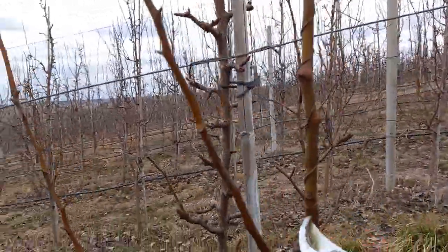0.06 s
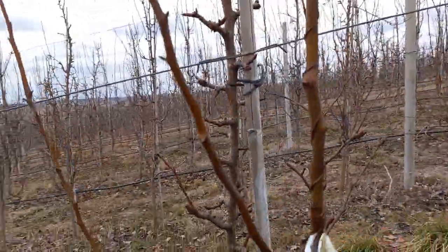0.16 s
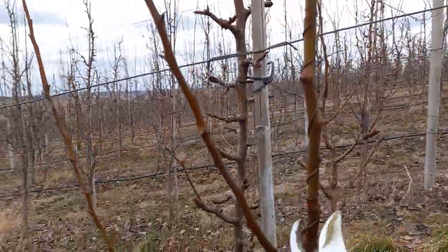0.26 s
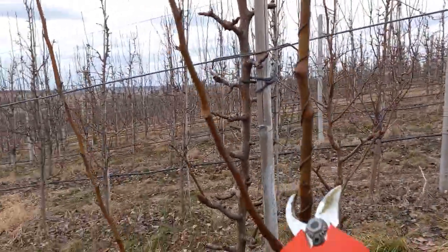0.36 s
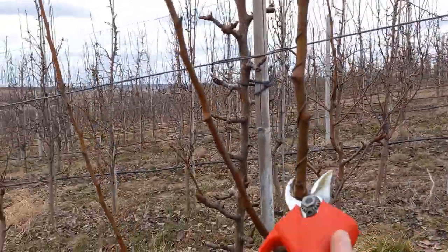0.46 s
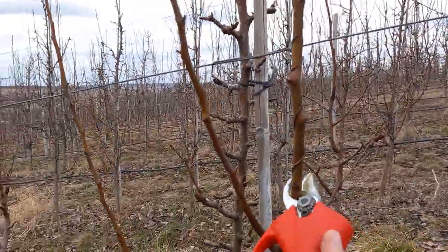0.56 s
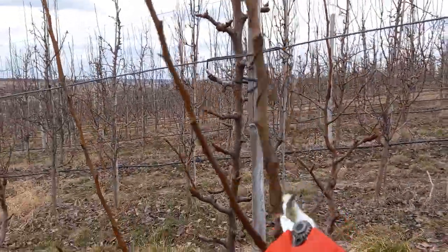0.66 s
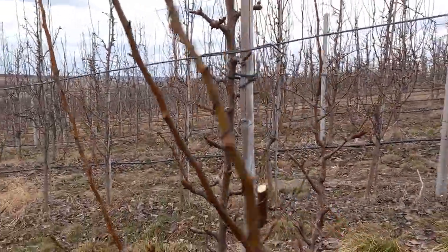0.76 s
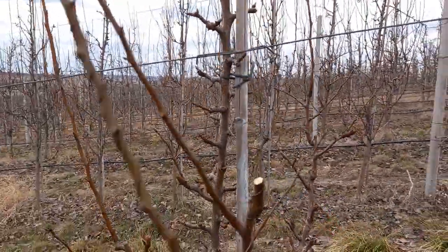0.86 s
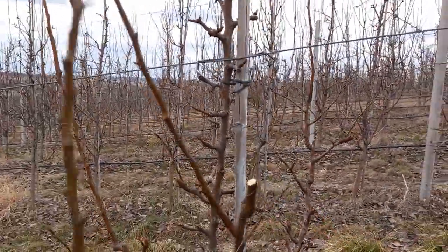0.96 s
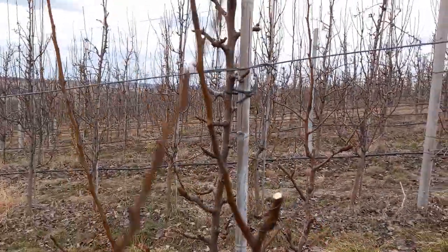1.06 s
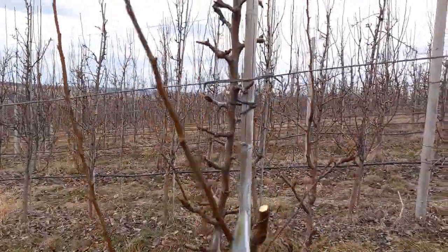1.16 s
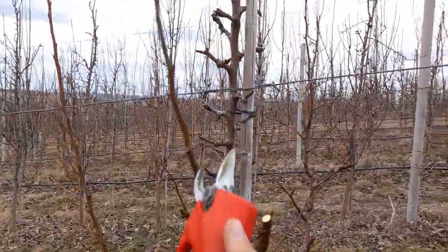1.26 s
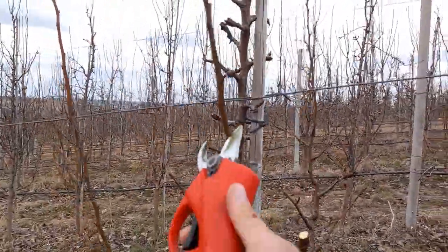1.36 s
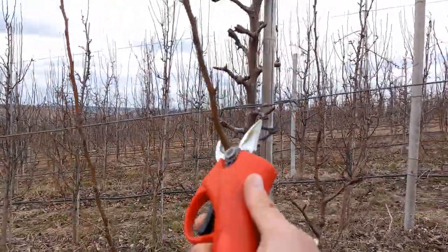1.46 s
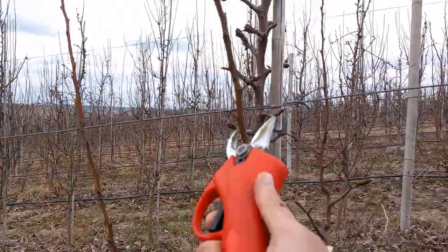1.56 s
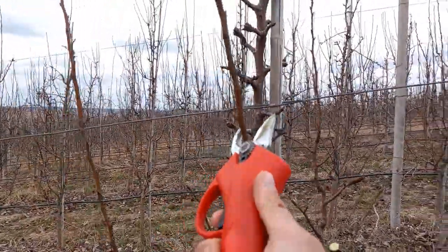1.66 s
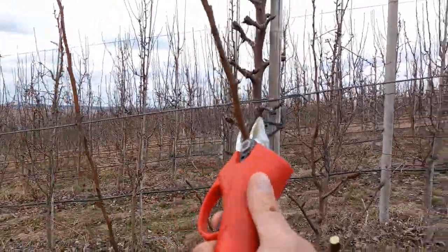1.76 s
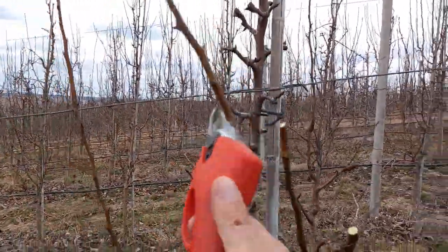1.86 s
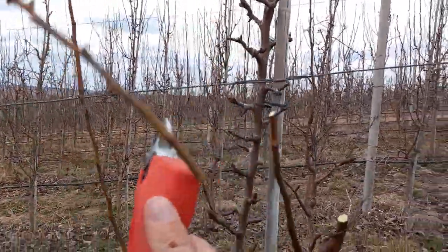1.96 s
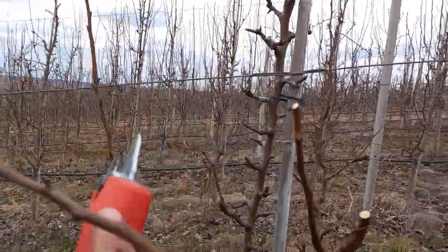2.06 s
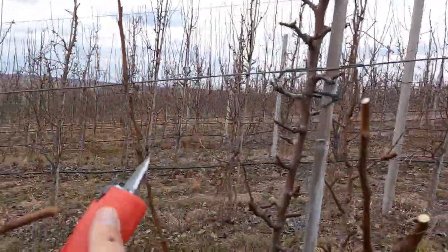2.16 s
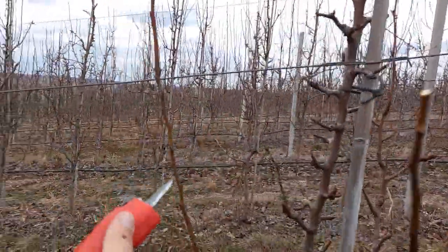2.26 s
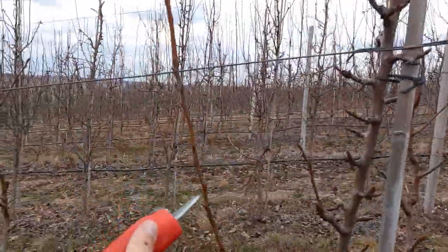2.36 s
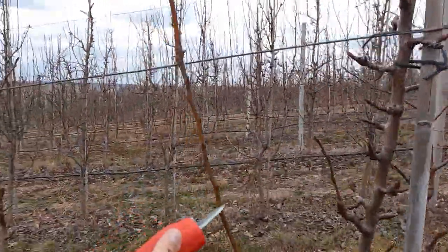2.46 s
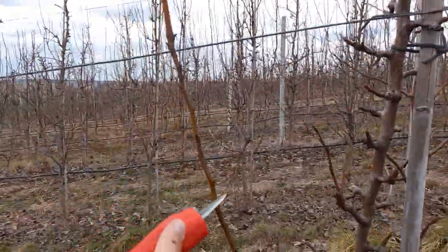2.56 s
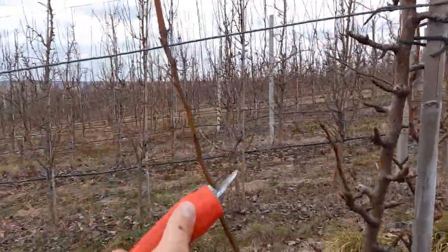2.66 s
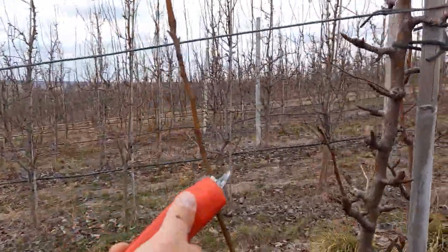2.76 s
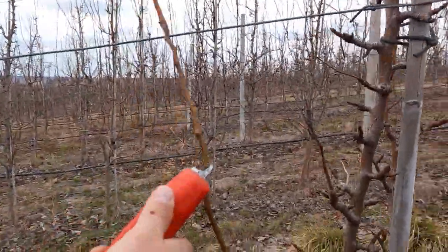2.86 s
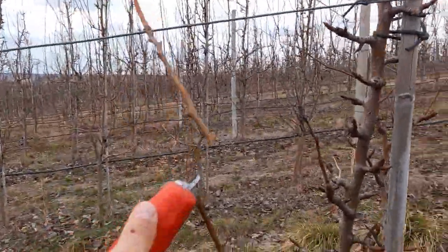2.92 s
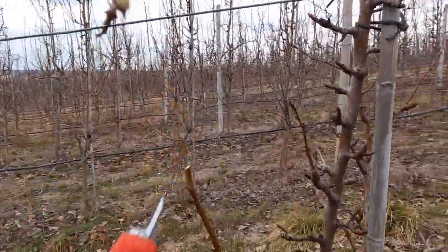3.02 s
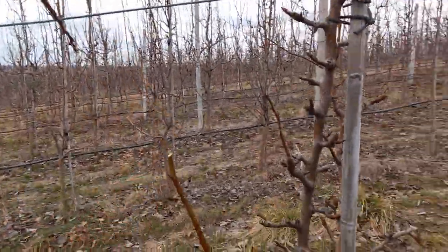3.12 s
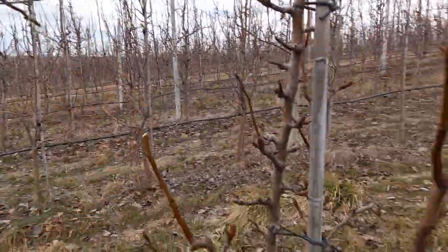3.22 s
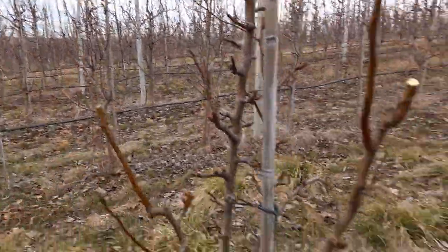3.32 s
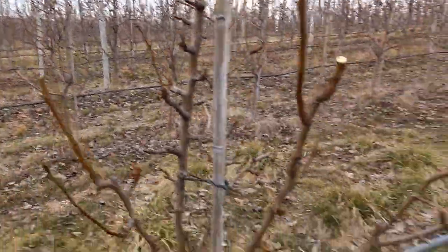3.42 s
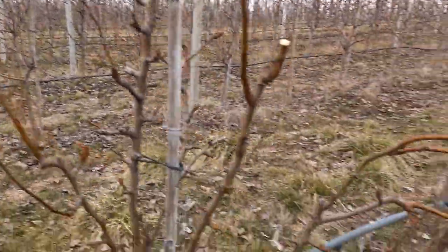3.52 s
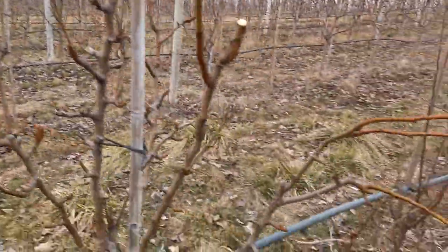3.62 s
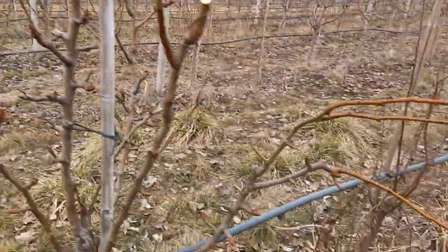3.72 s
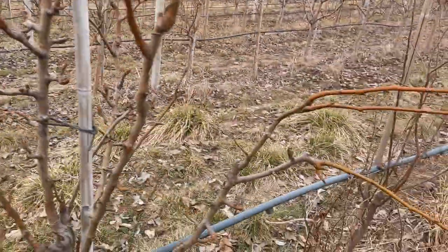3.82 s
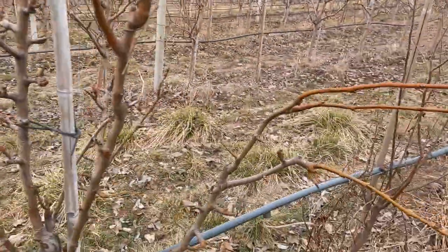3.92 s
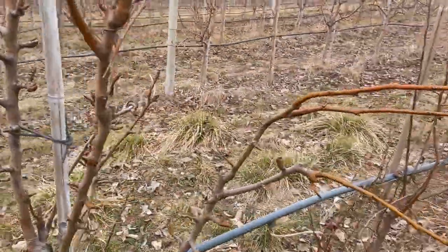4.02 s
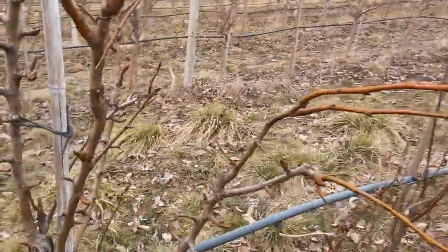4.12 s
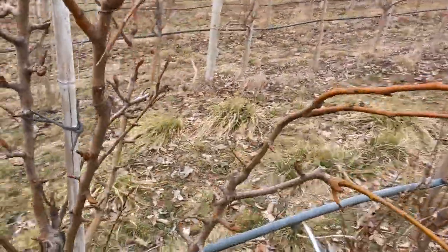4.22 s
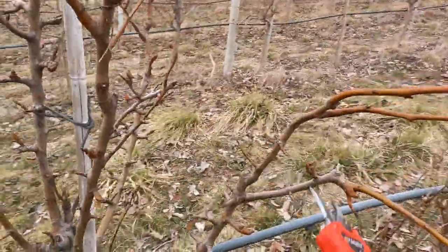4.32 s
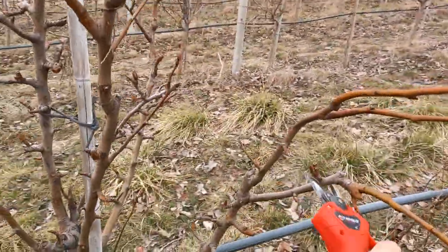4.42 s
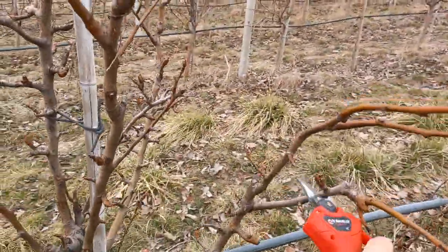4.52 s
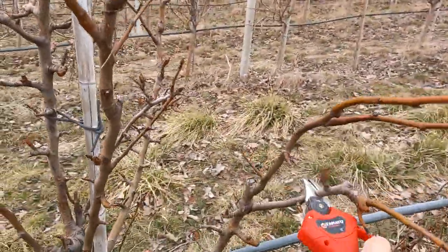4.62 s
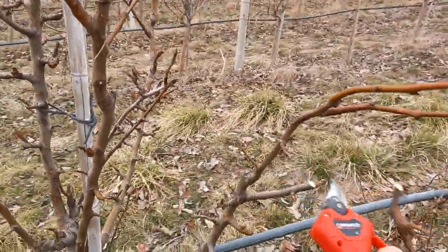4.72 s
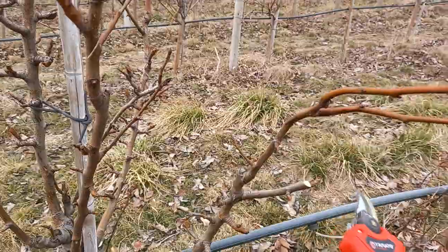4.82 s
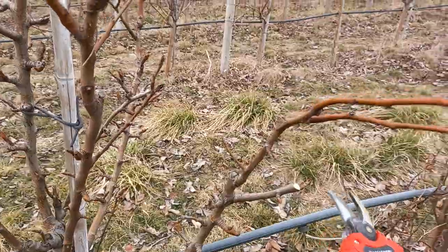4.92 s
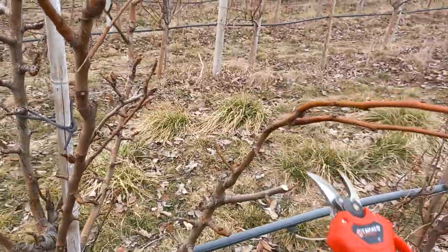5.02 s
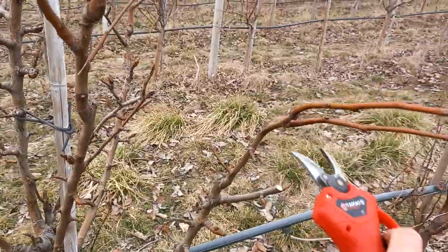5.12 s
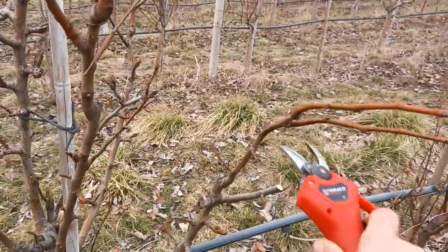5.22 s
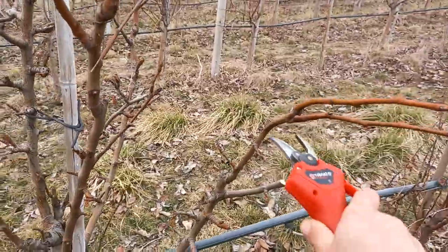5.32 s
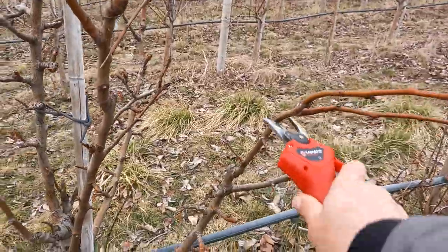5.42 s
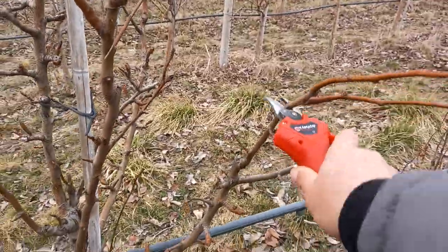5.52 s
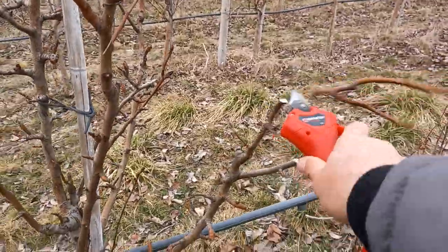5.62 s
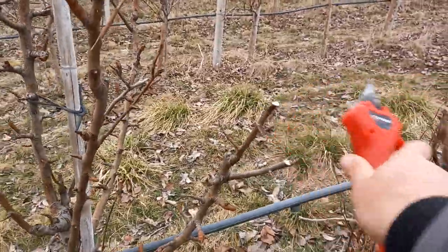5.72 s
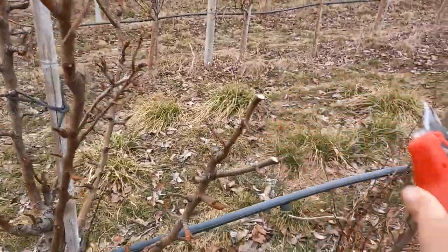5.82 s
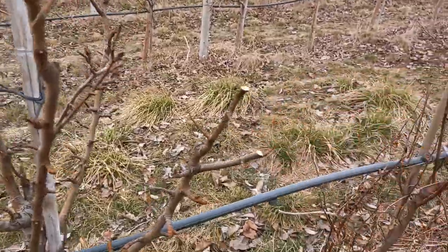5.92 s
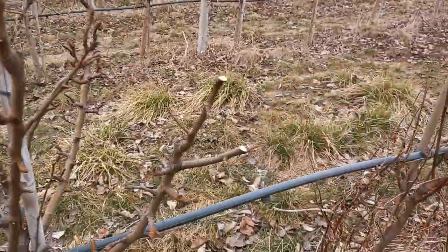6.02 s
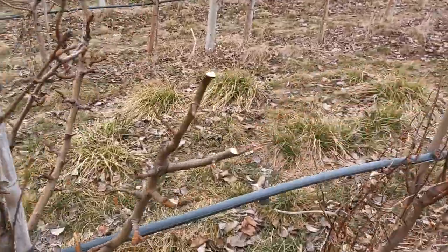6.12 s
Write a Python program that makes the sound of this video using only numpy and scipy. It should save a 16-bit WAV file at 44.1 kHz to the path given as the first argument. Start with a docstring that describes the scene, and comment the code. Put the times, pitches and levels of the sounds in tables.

```python
"""A low wind rumbles and thumps on the microphones; close by, battery pruning shears cut five shoots.
Each stroke starts with a tiny electric chirp, whirs a geared motor up and down, and clacks on a stop.
As the blade closes, the gears squeal and the wood crunches until it snaps.
Around the cuts, a sleeve rustles and twigs brush and tick in the orchard."""
import sys
import numpy as np
from scipy import signal
from scipy.fft import rfft, irfft, next_fast_len
from scipy.io import wavfile
from scipy.ndimage import map_coordinates

SR = 44100
rng = np.random.default_rng(int(sys.argv[2]) if len(sys.argv) > 2 else 0)


def waveform_to_disk(signal):
    """Save audio, clipped to [-1, 1], as 16-bit WAV at the path in sys.argv[1]."""
    frames = np.transpose(np.atleast_2d(signal))
    scaled = np.clip(frames, -1, 1) * 32767
    samples = np.round(scaled).astype(np.int16)
    wavfile.write(sys.argv[1], SR, samples)


N = 272538
TIME = np.arange(N) / SR
STROKE_TIME = np.arange(round(.28 * SR)) / SR


def amp(db):
    """Turns decibels into a gain."""
    return 10 ** (np.asarray(db) / 20)


def unit_power(x):
    """Scales a signal to an average power of one."""
    return x / np.sqrt(np.mean(x ** 2) + 1e-20)


def at_pitch(points, hz):
    """Reads a curve along a logarithmic pitch axis."""
    pitch, value = np.transpose(points)
    return np.interp(np.log(hz + 1), np.log(pitch), value)


def at_time(points, t):
    """Reads a curve along time."""
    return np.interp(t, *np.transpose(points))


def add(mix, start_s, sound):
    """Mixes a sound in at its start time."""
    part = mix[:, max(round(start_s * SR), 0):][:, :sound.shape[-1]]
    part += sound[..., :part.shape[1]]


def drift(t, hz):
    """A smooth random wobble that changes about hz times a second."""
    spectrum = rfft(rng.standard_normal(len(t)))
    return unit_power(irfft(spectrum / (1 + (np.fft.rfftfreq(len(t), 1 / SR) / hz) ** 4), len(t)))


def coloured(x, spectrum, body_db=0, treble_db=0, modes=(), size=4096):
    """Shapes the tone: body lifts the band under 3 kHz, treble the sizzle near 11 kHz, modes ring."""
    hz = np.fft.rfftfreq(size, 1 / SR)
    tilt = at_pitch([(2500, body_db), (4200, 0), (7500, 0), (11000, treble_db),
                     (16000, treble_db / 3)], hz)
    peaks = sum(db / (1 + (2 * (hz - centre) / width) ** 2) for centre, width, db in modes)
    log_gain = np.log(unit_power(amp(at_pitch(spectrum, hz) + tilt + peaks)))
    mirrored = np.concatenate([log_gain, log_gain[-2:0:-1]])
    taps = np.fft.ifft(np.exp(np.conj(signal.hilbert(mirrored)))).real  # rings only after a sound
    return signal.oaconvolve(x, taps[None], axes=1)[:, :x.shape[1]]


# How alike the two microphones hear noise: pitch_hz, likeness (0 or less is unrelated, 1 the same)
LIKENESS = [(100, -3.5), (600, 0.3), (2000, 0.86), (4000, 0.46), (6500, 0.5), (9000, 0.06), (15000, 0.13)]
def noise_pair(n):
    """Left and right white noise, most alike around 2 kHz."""
    left, other = rfft(rng.standard_normal((2, n)))
    same = np.clip(at_pitch(LIKENESS, np.fft.rfftfreq(n, 1 / SR)), 0, 1)
    return irfft(np.array([left, same * left + np.sqrt(1 - same ** 2) * other]), n)


def grains(n, per_s, spread_db, t60, bed):
    """A loudness curve of tiny uneven bursts on a steady bed; each fades 60 dB in t60 seconds."""
    chance, size = rng.random(n), np.minimum(rng.exponential(1, n), 4)
    power = (chance < per_s / SR) * amp(spread_db * size) ** 2
    power = signal.lfilter([1], [1, -np.exp(-2 * np.log(1000) / (t60 * SR))], power)
    return unit_power(np.sqrt(power / (power.mean() + 1e-12) + bed))


def hit(db, body_db, t60, spectrum, crack=0.53, size=4096):
    """A sharp crack and a short noisy ring; db sets the level of the first 2 ms."""
    t = np.arange(size) / SR
    ring = noise_pair(size) * amp(-60 * t / t60)
    first = round(.002 * SR)
    ring /= np.linalg.norm(ring[0, :first])
    ring[:, 0] += crack
    return amp(db) * np.sqrt(first / (1 + crack ** 2)) * coloured(ring, spectrum, body_db)


def turbulence(spectrum, lumpy_db, eddy_hz=25):
    """Lumpy noise like swirling air, different at each microphone."""
    lumps = unit_power(amp(lumpy_db * np.clip(drift(TIME, eddy_hz), -2, 2)))
    return coloured(lumps * rng.standard_normal((2, N)), spectrum)


# Tone of still air and of three wind layers, deepest first: pitch_hz, gain_db
AIR_TONE = [(30, -8), (90, 0), (200, -9), (500, -5), (1500, -4), (3000, -4.5), (6200, 5.5), (7500, -14.5),
            (11000, 4.5), (15800, -19)]
RUMBLE_TONE = [(15, -27), (40, -15.5), (65, -3), (88, 3.5), (125, -6), (180, -14.5), (350, -32.5),
               (1000, -66.5)]
FLUTTER_TONE = [(90, -12.5), (160, -11), (230, -4.5), (300, 2.5), (450, -14), (1500, -61)]
BUFFET_TONE = [(200, -24), (290, -8.5), (370, 5), (520, -6), (750, -17.5), (1500, -40.5), (4000, -56.5)]
# Wind on the microphones: time_s, strength_db
WIND = [(0.0, -40), (0.05, -29.5), (0.25, -35.5), (0.42, -51), (0.72, -48), (1.0, -74), (1.65, -88.5),
        (1.76, -61), (1.95, -76), (2.55, -89), (2.92, -76.5), (3.22, -47.0), (3.38, -52.5), (3.5, -31.5),
        (3.7, -32.5), (3.79, -46), (3.86, -36), (4.05, -43), (4.34, -40), (4.42, -52), (4.66, -55.5),
        (4.85, -90), (5.0, -62), (5.25, -81.5), (5.7, -85.5), (6.18, -62.5)]
def wind():
    """Three layers grow with the wind, each up to a ceiling, over still outdoor air."""
    out = amp(-68.5) * coloured(rng.standard_normal((2, N)), AIR_TONE)
    strength_db = at_time(WIND, TIME)
    for tone, offset_db, ceiling_db, lumpy_db in (
            (RUMBLE_TONE, 1.4, -26.5, 2), (FLUTTER_TONE, -7.5, -38.5, 4), (BUFFET_TONE, -9.5, -58, 3.5)):
        out += turbulence(tone, lumpy_db) / np.hypot(amp(-strength_db - offset_db), amp(-ceiling_db))
    return out


# Soft low swells: peak_s, half_length_s, level_db
LOW_SWELLS = [(0.201, 0.28, -49), (0.488, 0.21, -43.5), (0.736, 0.089, -46.5), (1.757, 0.064, -47.5),
              (1.837, 0.18, -56), (2.028, 0.038, -39.5), (2.19, .14, -53.5), (2.802, 0.086, -52.5),
              (3.054, 0.07, -46.5), (3.215, 0.073, -43.5), (3.59, 0.38, -48), (4.67, 0.12, -61.5),
              (4.924, 0.1, -54), (4.982, 0.019, -44.5), (5.62, 0.11, -68.5), (5.878, 0.035, -55)]
def low_swells():
    """Noise swells softly near 350 Hz: air buffets, handling, and motor hum at top speed."""
    swell = sum(amp(db) * np.exp(-2 * ((TIME - peak) / half) ** 2) for peak, half, db in LOW_SWELLS)
    return swell * (turbulence(BUFFET_TONE, 4) + amp(-9) * turbulence(FLUTTER_TONE, 2))


# Tone of a rustle's high hiss and lower body: pitch_hz, gain_db
HISS_TONE = [(2000, -62), (3500, -3.5), (4800, 3.5), (6300, 7), (7400, -11), (9000, -6), (12000, -3),
             (15800, -1)]
BODY_TONE = [(300, -13), (900, 0.5), (1600, -0.5), (3200, 4), (5000, -23.5)]
# Rustles: start_s, length_s, hiss_db, body_db (before body_trim_db)
RUSTLES = [(0, 0.095, -63, -55), (0.33, 0.056, -49.5, -49.5), (0.652, 0.061, -56, -42.5),
           (1.153, 0.048, -64.5, -52.5), (1.313, 0.029, -57.5, -65), (1.358, 0.11, -48.5, -51.5),
           (1.57, 0.042, -50, -53.5), (2.13, 0.51, -60, -67), (2.302, .13, -47, -50.5),
           (2.531, 0.034, -42.5, -43.5), (2.847, 0.068, -44, -45.5), (3.17, 0.72, -50, -62),
           (3.32, 0.23, -58.5, -56.5), (3.706, .08, -55, -45), (3.835, 0.049, -37, -45.5),
           (3.907, 0.12, -40, -47.5), (4.06, .17, -53, -66), (4.25, 0.34, -50.5, -56),
           (5.003, 0.039, -31, -37), (5.072, 0.081, -48, -50.5), (5.18, 0.17, -61.5, -81),
           (6.051, 0.073, -43.5, -54), (6.152, 0.042, -40, -52)]
def rustles(edge_db=-15.5, body_trim_db=-6):
    """Sleeve and branches rub, making grainy noise that swells and dies away."""
    hiss, body = np.zeros((2, 1, N))
    for start, length, hiss_db, body_db in RUSTLES:
        progress = (TIME - start) / length
        swell = np.interp(progress, [-.1, 0, .24, 1, 1.52], [0, amp(edge_db), 1, amp(edge_db / 2), 0])
        hiss += amp(hiss_db) * swell
        body += amp(body_db + body_trim_db) * swell
    grain = grains(N, per_s=400, spread_db=4, t60=0.0065, bed=.9)
    return (hiss * coloured(grain * noise_pair(N), HISS_TONE)
            + body * coloured(grain * noise_pair(N), BODY_TONE))


def chirp(db, centre_hz, pulse_hz=887, width_hz=850, length_s=0.0047, ring_s=0.00071):
    """Electric pulses in the coils make the motor ring briefly before it turns."""
    t = np.arange(round(SR / 50)) / SR
    hz = pulse_hz * np.arange(5, 10)
    weight = np.exp(-((hz - centre_hz) / width_hz) ** 2 / 2) + 0.0075
    overtones = np.cos(2 * np.pi * hz[:, None] * (t - 1 / pulse_hz))
    buzz = np.sqrt(2) * weight / np.linalg.norm(weight) @ overtones
    return amp(db) * buzz * np.minimum(t / 0.0021, 1) * np.exp(-np.maximum(t - length_s, 0) / ring_s)


def tooth_flaws(t, turns):
    """Flaws in the gear teeth repeat every turn: faint high tones that glide with the speed."""
    multiples = np.arange(9, 44)[:, None]
    angle = 2 * np.pi * multiples * (turns + .004 * drift(t, 130))
    size = rng.standard_normal((2, len(multiples))) + 1j * rng.standard_normal((2, len(multiples)))
    return amp(-9.5) * unit_power((size @ np.exp(1j * angle)).real)


def grip_modes(count=16, low_hz=2500, high_hz=15000, width_hz=260, range_db=6):
    """Grip and blade position shift the housing's small resonances, drawn anew for each stroke."""
    place, size = rng.random((2, count))
    centres_hz = low_hz + (high_hz - low_hz) * (np.arange(count) + place) / count
    return [(hz, width_hz, db) for hz, db in zip(centres_hz, range_db * (size - .4))]


# Tone of the gears: pitch_hz, gain_db
GEAR_TONE = [(250, -43.5), (360, -26), (750, -26.5), (1400, -13.5), (2150, -8), (3100, -13.5), (3800, -3.5),
             (4900, -2), (6000, 5), (6700, 0), (7450, -18), (9000, -7), (11200, 0), (15800, -12.5)]
# Where the tool's housing rings: pitch_hz, width_hz, boost_db
HOUSING = [(2410, 520, 3.1), (3810, 110, 7.1), (4750, 30, 1.1), (5900, 160, 2.4), (6180, 67, 2.9),
           (6830, 210, 3.3), (6960, 160, 3), (10800, 220, 0.74)]
def gear_rattle(t, turns, body_db, treble_db, uneven_db=2.5, chatter_db=1.03):
    """Gear teeth slide and knock with uneven force, four to a turn, and ring the housing."""
    teeth = 4 * turns
    force = amp(uneven_db * np.clip(rng.standard_normal(size=1024), -2, 2))[teeth.astype(int)]
    contact = 0.85 + np.exp(-(teeth % 1) / 0.36)  # steady sliding plus a fading knock
    knocks = unit_power(force * contact * amp(chatter_db * drift(t, 70)))
    scrape = 0.69 * noise_pair(len(t)) + tooth_flaws(t, turns)
    return coloured(knocks * scrape, GEAR_TONE, body_db, treble_db, HOUSING + grip_modes())


# The whine's tones: cycles_per_turn of the shaft
WHINE_MULTIPLES = [1, 4, 6, 8, 10.5, 12, 16]
def gear_whine(t, shaft_hz, turns, tones_db, whine_db, top_db):
    """Meshing gears sing; their slack wobbles the shaft, which blurs the high tones most."""
    out = 0
    for multiple, tone_db in zip(WHINE_MULTIPLES, tones_db):
        db = whine_db + tone_db + top_db * (multiple == WHINE_MULTIPLES[-1])
        wobble = .008 * drift(t, 130)
        tone = np.sqrt(2) * np.sin(2 * np.pi * multiple * (turns + rng.random() + wobble))
        out += amp(db + at_pitch(GEAR_TONE, multiple * shaft_hz)) * tone
    return out * np.clip((t - .045) / 0.034, 0, 1)  # fades in as the slack is taken up


# Shaft speed through a stroke, before drag: time_s, speed_hz
SPEED = [(0, 5), (.03, 115), (.05, 212), (.07, 287), (.085, 320), (.1, 343), (.115, 357), (.128, 364),
         (.141, 363), (.155, 346), (.175, 313), (.19, 285), (.21, 258), (.245, 200)]
# Tone of the blade hitting its stop: pitch_hz, gain_db
STOP_TONE = [(200, -47), (1000, -9.5), (2100, 6.5), (3200, -1.5), (4200, -0.5), (6200, 0), (7450, -20),
             (11000, -5.5), (15800, -15.5)]
def stroke(swell, tones_db, travel_s, db, clack_db, body_db, treble_db, whine_db, top_db,
           chirp_db, chirp_hz, drag=0, brake_s=0.0039):
    """A chirp, then the gears run until the blade clacks on its stop; drag slows the trip."""
    t = STROKE_TIME
    shaft_hz = (1 - drag) * at_time(SPEED, t)
    turns = np.cumsum(shaft_hz) / SR
    stop_s = travel_s / (1 - drag)
    rattle = gear_rattle(t, turns, body_db, treble_db)
    whine = gear_whine(t, shaft_hz, turns, tones_db, whine_db, top_db)
    running = np.exp(-np.maximum(t - stop_s, 0) / brake_s)
    out = amp(db + at_time(swell, t)) * running * (rattle + whine)
    add(out, 0, chirp(chirp_db, chirp_hz))
    add(out, stop_s, hit(clack_db, body_db=0, t60=0.013, spectrum=STOP_TONE))
    return out


# How the gear noise swells through a stroke: time_s, gain_db
OPEN_SWELL = [(0, -16), (0.016, -14.5), (0.041, -2.5), (.08, -2.5), (.13, -0.5), (.17, -3.5), (.235, -8)]
CLOSE_SWELL = [(0, -11), (0.021, -16), (0.044, -7), (.08, -3.5), (.11, -1), (.15, 3.5), (.235, -1.5)]
# Strength of each tone in WHINE_MULTIPLES: gain_db
OPEN_WHINE = [-2, 3, -4, -3, -6, -8, -8]
CLOSE_WHINE = [-13, -2.5, -18.5, -8.5, -2, -31.5, -15]
# Strokes: start_s, level_db, clack_db, body_db, treble_db, whine_db, top_tone_extra_db,
# chirp_db, chirp_hz; closings add drag (share of speed lost)
OPENINGS = [(.0935, -29, -31.5, 1, -3.5, -9.5, 6.5, -33, 5330),
            (.7370, -29, -31.5, 10.5, 0, -7, -12, -26.5, 5350),
            (1.8778, -24.5, -21.5, 8, -5, -6, 0, -22, 5130),
            (2.9010, -27, -24.5, 10, -2, -4, -21, -15, 4750), (4.7630, -27.5, -29, 4, 0, -7, 5, -26, 5380),
            (5.7384, -25.5, -22, 4, -1, -6.5, 0, -23, 4900)]
CLOSINGS = [(0.4226, -27, -27.5, -4, 0, -5.5, -2, -27.5, 5480, .075),
            (1.6223, -27, -19.5, 3.5, -3.7, -4.9, 1, -19.5, 5560, 0.0023),
            (2.592, -28.5, -29, 7.5, -3.2, -3.4, 12.5, -33.5, 5250, 0.0035),
            (4.4621, -28.5, -30, 5, -2, -0.96, -23, -28.5, 4560, .012),
            (5.4380, -29, -24, 6, 0.61, 0.61, -2, -24.5, 4940, 0.0058)]
def shears(open_s=.2417, close_s=.2345):
    """The motor opens the blade six times and closes it five times."""
    out = np.zeros((2, N))
    for start, *settings in OPENINGS:
        add(out, start, stroke(OPEN_SWELL, OPEN_WHINE, open_s, *settings))
    for start, *settings in CLOSINGS:
        add(out, start, stroke(CLOSE_SWELL, CLOSE_WHINE, close_s, *settings))
    return out


# Gusts: peak_s, peak_db, pitch_hz
THUMPS = [(.159, -21, 75.6), (0.251, -22, 82.6), (3.699, -40, 65), (3.868, -25.5, 89.5)]
def thumps():
    """Each gust hits the microphones with one swing of air pressure."""
    out = np.zeros((2, N))
    t = np.arange(-SR // 20, SR // 20) / SR
    for peak_s, db, hz in THUMPS:
        add(out, peak_s + t[0], amp(db) * np.cos(2 * np.pi * hz * t) * np.exp(-(2.1 * hz * t) ** 2))
    return out


# Tone of a twig: pitch_hz, gain_db
TWIG_TONE = [(200, -28.5), (700, -8), (1500, 2), (3000, -0.5), (4500, 7.5), (6300, 10), (7400, -15),
             (9000, -1), (12000, 2.5), (15800, -4.5)]
# Ticks: start_s, level_db, body_db, ring_s
TICKS = [(.358, -39.5, -6, 0.007), (0.415, -44, 7.5, .016), (0.432, -35.5, -5, .012),
         (1.142, -35, 11, 0.048), (1.1596, -24, 6.5, 0.019), (1.376, -31, -1, 0.041),
         (1.408, -34.5, 8, 0.013), (1.439, -41, 16, 0.031), (1.545, -45.5, 7, 0.034),
         (2.163, -47.5, 13, 0.0072), (2.515, -25, 0, 0.071), (3.473, -31.5, -5, 0.019),
         (3.706, -30, -5.5, 0.068), (3.784, -39, 12, 0.0068), (3.856, -30.5, -7, 0.0083),
         (3.914, -29.5, -37, 0.0085), (3.942, -33, -16, 0.013), (4.024, -35.5, -2.5, 0.03),
         (5.113, -40.5, 6, 0.016), (5.128, -39.5, 10, 0.021), (6.007, -23, -9, 0.018),
         (6.022, -28.5, -16, 0.12), (6.038, -31.5, 8, 0.093)]
def twig_ticks():
    """Twigs tap the tool and each other."""
    out = np.zeros((2, N))
    for start, *blow in TICKS:
        add(out, start, hit(*blow, TWIG_TONE))
    return out


# Tone of breaking wood: pitch_hz, gain_db
WOOD_TONE = [(170, -45), (600, -12), (1300, -6.5), (2300, -5.5), (3000, -0.5), (3700, 3), (5000, 5.5),
             (6100, -0.5), (6700, 4), (7450, -32.5), (8500, -11), (11500, 3.5), (15800, -3.5)]
def crunch(start, bite, snap, db, body_db, treble_db, squeal_db, squeak_db, first_hz, last_hz, lead_rad):
    """Fibres crack ever harder, the blade squeaks, the straining gears squeal and sag, then all let go."""
    t = start + STROKE_TIME
    load = amp(at_time([(bite - .028, -45), (bite - .007, -12), (bite + .0049, -6),
                        ((bite + snap) / 2 + .0059, 0), (snap, 0), (snap + .011, -50)], t))
    fibres = grains(len(t), per_s=630, spread_db=-4.5, t60=0.001, bed=0.38) * noise_pair(len(t))
    cracks = amp(db) * coloured(fibres, WOOD_TONE, body_db, treble_db, HOUSING)
    squeal_hz = np.interp(t, [bite - .007, snap], [first_hz, last_hz]) + 25 * drift(t, 230)
    angle = 2 * np.pi * np.cumsum(squeal_hz) / SR
    creak = amp(-20) * np.sin(angle / 4)  # a slower gear, two octaves down
    easing = np.clip((snap - t) / 0.022, .3, 1)
    squeal = (np.sin(angle + np.array([[0], [lead_rad]])) + creak) * easing
    squeak_hz = 6100 + 220 * drift(t, 400)
    squeak = np.sin(2 * np.pi * np.cumsum(squeak_hz) / SR) * unit_power(amp(2.7 * drift(t, 150)))
    return load * (cracks + np.sqrt(2) * (amp(squeal_db) * squeal + amp(squeak_db) * squeak))


# One cut per closing: bite_s, snap_s, snap_db, crunch_db, body_db, treble_db, squeal_db, squeak_db,
# squeal_start_hz, squeal_end_hz, squeal_right_lead_rad
CUTS = [(0.548, 0.6287, -14, -23, 4.5, -2, -26.5, -21, 3470, 2900, 1),
        (1.777, 1.813, -17, -19, 3.5, -6, -20, -15.5, 3820, 3200, 3.5),
        (2.745, 2.774, -17, -25, 3, -10, -20, -35, 3777, 3410, -1),
        (4.593, 4.655, -22.5, -25.5, 1, -19, -37.5, -28, 3690, 3160, 0),
        (5.57, 5.636, -21, -24, 3.5, -9, -30, -58, 3855, 3460, 2.5)]
def wood_cuts():
    """Each shoot crunches and snaps; its last fibres splinter just after."""
    out = np.zeros((2, N))
    for (start, *_), (bite_s, snap_s, snap_db, *settings) in zip(CLOSINGS, CUTS):
        add(out, start, crunch(start, bite_s, snap_s, *settings))
        add(out, snap_s, hit(snap_db, body_db=15, t60=0.03, spectrum=WOOD_TONE))
        add(out, snap_s + .018, hit(db=-30, body_db=15, t60=0.074, spectrum=WOOD_TONE))
    return out


# Brushes: start_s, length_s, level_db, body_db
BRUSHES = [(1.367, 0.033, -34.5, -3), (1.471, 0.022, -43.5, -10), (2.497, 0.043, -28.5, -2.5),
           (3.15, 0.017, -35.5, 23), (3.401, 0.098, -37.5, -7), (3.853, 0.06, -45, 5),
           (6.017, 0.027, -31, 13)]
def twig_brushes():
    """Shoots slide over the tool with a short scratch."""
    out = np.zeros((2, N))
    t = np.arange(SR // 5) / SR
    for start, length, db, body_db in BRUSHES:
        swell = np.interp(t / length, [0, .3, 1, 1.5], [0.075, 0.92, 0.0025, 0.043])
        scratch = grains(len(t), per_s=2900, spread_db=6, t60=0.013, bed=0.35) * noise_pair(len(t))
        add(out, start, amp(db) * coloured(swell * scratch, TWIG_TONE, body_db))
    return out


def orchard_echo(x, near_db=-17, near_t60=0.087, far_db=-33, far_t60=0.041):
    """Sound scatters off the hand and trunks, and more faintly off the tree rows."""
    t = np.arange(SR // 2) / SR
    tail = 0
    for db, t60 in (near_db, near_t60), (far_db, far_t60):
        scatter = rng.standard_normal((2, len(t))) * amp(-60 * t / t60)
        tail += amp(db) * scatter / np.linalg.norm(scatter[0])
    return x + signal.oaconvolve(x, tail, axes=1)[:, :N]


# Direction of the tool: time_s, left_lead_s
LEFT_LEAD = [(.2, .00017), (.6, .000165), (.85, .0001), (1.75, .000108), (2.0, .00001), (2.72, -.000057),
             (3.05, -.00014), (3.6, 0), (4.55, .00018), (4.9, .00022), (5.58, .000175), (5.85, .00029)]
# Balance of the microphones: pitch_hz, left_minus_right_db
BALANCE = [(300, -1), (1500, -1.5), (5000, -2), (9000, -5), (14000, -4)]
def microphones(x):
    """The tool's sound reaches the nearer microphone first; the left one is duller."""
    shift = at_time(LEFT_LEAD, TIME) * SR / 2
    left = map_coordinates(x[0], [np.arange(N) + shift], order=5)
    right = map_coordinates(x[1], [np.arange(N) - shift], order=5)
    size = next_fast_len(N)
    tilt_db = at_pitch(BALANCE, np.fft.rfftfreq(size, 1 / SR)) / 2
    return irfft(rfft([left, right], size) * amp([tilt_db, -tilt_db]), size)[:, :N]


def scene():
    """Shears and twigs close by, in light wind."""
    pruning = shears() + wood_cuts() + rustles() + twig_brushes() + twig_ticks()
    return microphones(orchard_echo(pruning)) + wind() + low_swells() + thumps()


def record(dry):
    """The recorder rounds off the loudest peaks and drops the highest treble."""
    ceiling, top_hz = .85, 15950
    rounded = dry / (1 + (dry / ceiling) ** 4) ** .25
    lowpass = signal.firwin(511, top_hz, window=("kaiser", 9), fs=SR)
    return signal.oaconvolve(rounded, lowpass[None], "same", axes=1)


dry = scene()
out = record(dry)
waveform_to_disk(out)
```